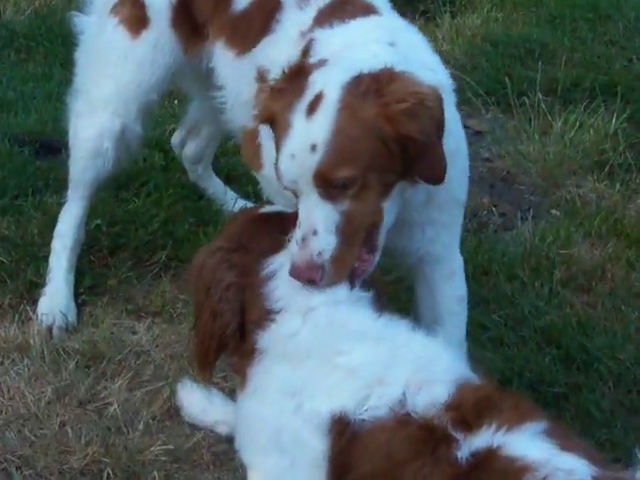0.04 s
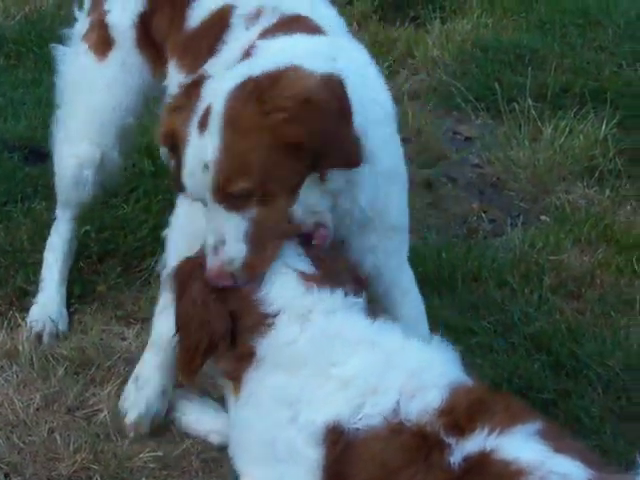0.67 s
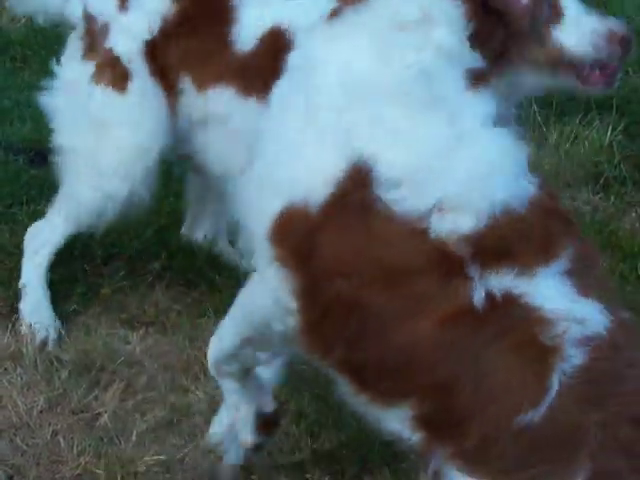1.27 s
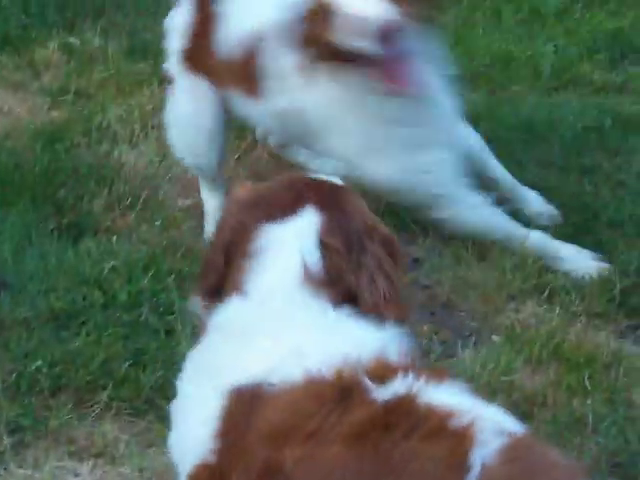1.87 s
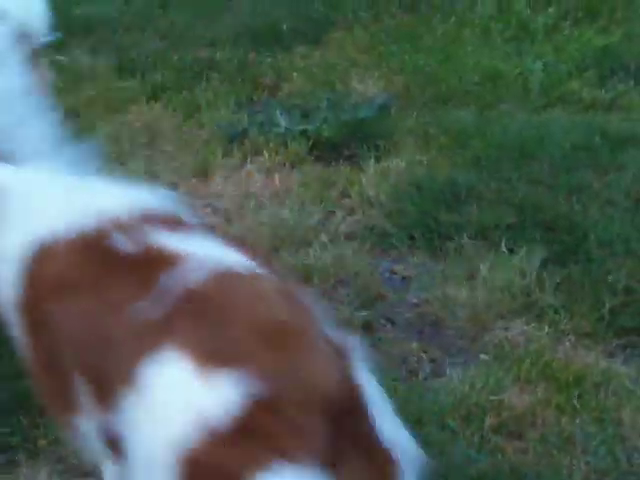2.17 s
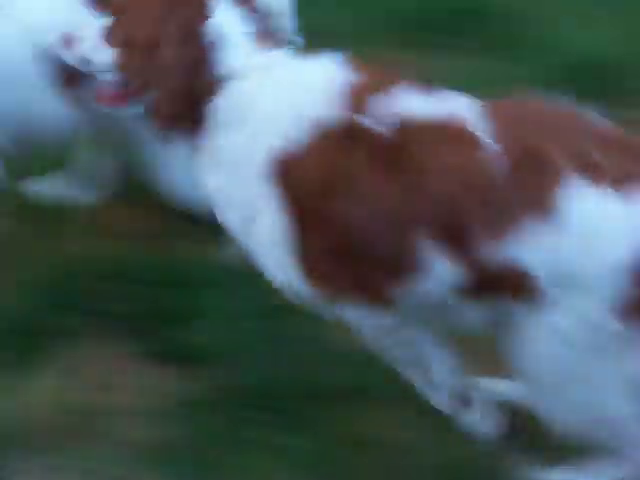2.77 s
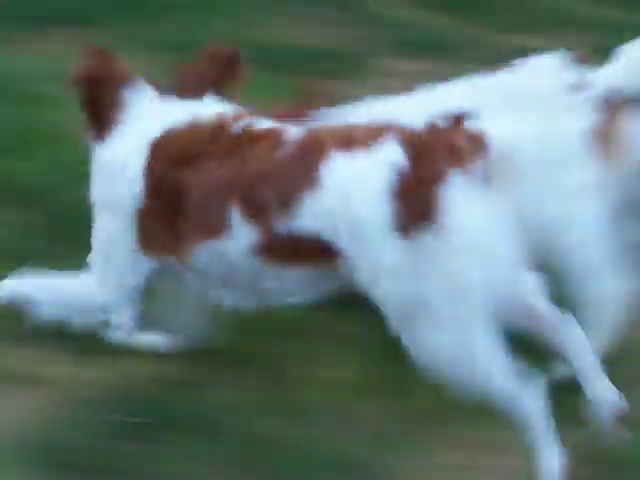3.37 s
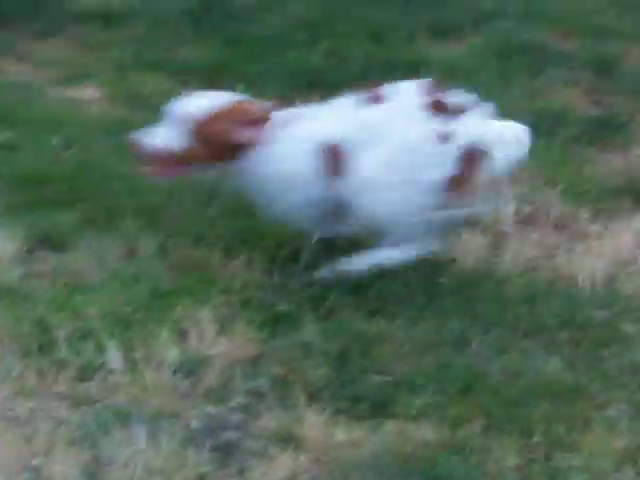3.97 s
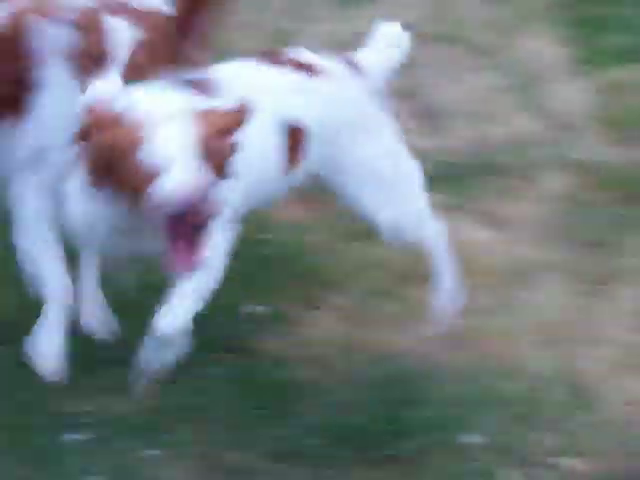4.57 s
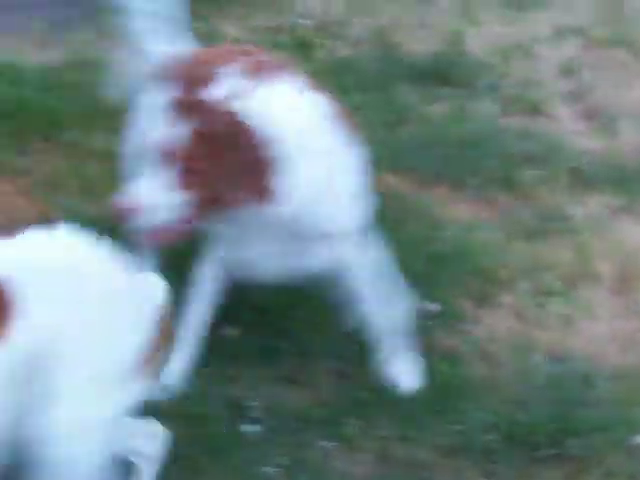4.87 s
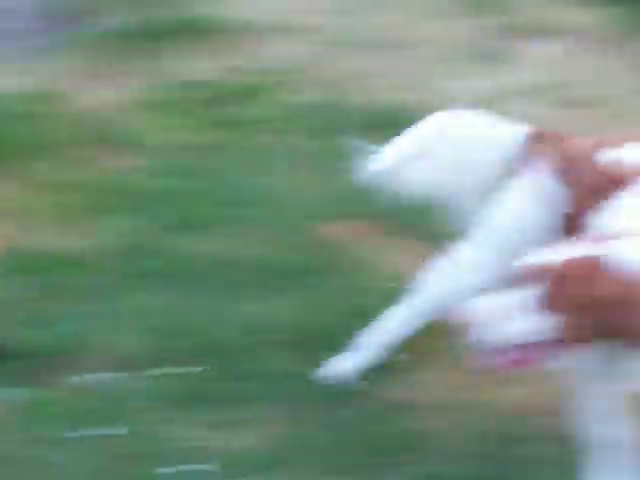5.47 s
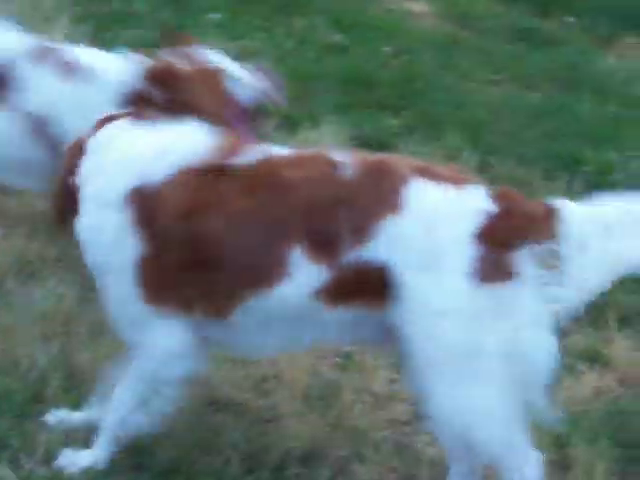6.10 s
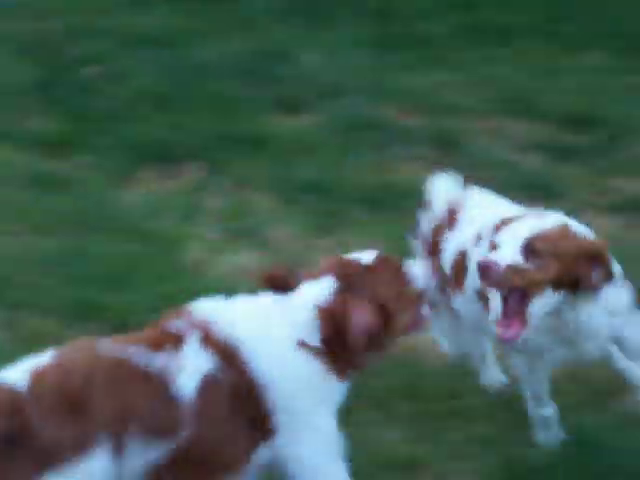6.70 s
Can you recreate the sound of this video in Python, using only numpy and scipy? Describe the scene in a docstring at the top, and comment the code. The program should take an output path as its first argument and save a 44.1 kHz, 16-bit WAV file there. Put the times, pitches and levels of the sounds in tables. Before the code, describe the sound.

Two dogs play-fight close by on a lawn, over soft, low outdoor air. From about 0.5 seconds come faint breathy huffs, and paws begin a light grass rustle that continues throughout. A brief growl and snarl sound at 1.2 seconds, with a small huff at 1.7. A loud, rough growl with a hissing rasp runs from 2.2 to 2.8 seconds, and a somewhat softer one from 3.2 to 3.7, with a jaw snap in it. Around 4.3 to 4.8 seconds a short growl mixes with several quick snaps and paw knocks, followed by another growl until 5.3. At about 5.85 seconds one dog gives a loud, hoarse bark. From 6.1 it slides into a yowl that rises to a peak near 6.35 and sinks back into a growl by 6.6. A quick snarl and a knock finish it. The yard adds a faint echo.

```python
"""Two dogs play-fighting on a lawn

Slack vocal folds shake chest and throat in bursts of growling; bared teeth add rasp, hiss and whistles.
Then one dog barks, and taut folds slide into a yowl that arches and sinks back to a growl.
Paws rustle in the grass, jaws snap, and the yard returns a faint echo over soft outdoor air."""
import sys
import numpy as np
from scipy import signal
from scipy.io import wavfile
from scipy.ndimage import uniform_filter1d

SR = 44100
rng = np.random.default_rng(int(sys.argv[2]) if len(sys.argv) > 2 else 0)


def transcribe(signal):
    """Save signal, clipped to [-1, 1], as a 16-bit WAV file at the path in sys.argv[1]."""
    frames = np.atleast_2d(signal).T
    limited = np.clip(frames, -1, 1)
    pcm = np.round(limited * 32767).astype(np.int16)
    wavfile.write(sys.argv[1], SR, pcm)


N = 297234
T = np.arange(N) / SR


def amp(db):
    """Decibels to gain."""
    return 10 ** (np.asarray(db) / 20)


def unit(x):
    """Scales to rms 1."""
    return x / np.sqrt(np.mean(x ** 2) + 1e-20)


def steady(x, size=1000):
    """Rides the gain to a running rms of 1, keeping the single pulses."""
    power = uniform_filter1d(uniform_filter1d(x ** 2, size), size)
    return x / np.sqrt(abs(power) + 1e-20)


def curve(t, points):
    """Automation: straight lines through (time, value) points."""
    return np.interp(t, *np.transpose(points))


def eq_db(points, hz):
    """An EQ curve's gain in dB at the given frequencies."""
    f, db = np.transpose(points)
    return np.interp(np.log(hz + 1), np.log(f), db)


def add(mix, start, sound):
    """Mixes a sound in at a time in seconds."""
    part = mix[max(round(start * SR), 0):][:len(sound)]
    part += sound[:len(part)]


def drift(t, hz):
    """Random wander of about unit size at the given rate."""
    knots = rng.standard_normal(8192)
    return np.interp((t - t[0]) * hz, np.arange(len(knots)), knots)


def colour(x, points, notches=(), size=4096):
    """Minimum-phase EQ with optional notches."""
    hz = abs(np.fft.fftfreq(size, 1 / SR))
    notch_db = sum(db / (1 + (2 * (hz - f) / width) ** 2) for f, width, db in notches)
    log_gain = np.log(amp(eq_db(points, hz) + notch_db))
    taps = np.fft.ifft(np.exp(np.conj(signal.hilbert(log_gain)))).real
    return signal.oaconvolve(x, taps)[:len(x)]


def resonate(x, hz, width_hz):
    """A sweepable resonance of gain 1."""
    turn = np.exp(2j * np.pi * np.cumsum(hz * np.ones(len(x))) / SR)
    pole = np.exp(-np.pi * width_hz / SR)
    return 2 * (turn * signal.lfilter([1 - pole], [1, -pole], x / turn)).real


def swell(start, length, attack_s, release_s, sag_db_per_s=0):
    """Scene-long gain envelope; attack and release are the times to move 20 dB."""
    outside = np.maximum(start - T, 0) / attack_s + np.maximum(T - start - length, 0) / release_s
    return amp(-20 * np.minimum(outside, 10) - sag_db_per_s * np.clip(T - start, 0, length))


def level(gains):
    """Joint level in dB of overlapping envelopes."""
    return 10 * np.log10(sum(g ** 2 for g in gains))


def blend(efforts):
    """Joint level in dB of (gain, setting) pairs, and their setting, led by the strongest."""
    gains = [g for g, _ in efforts]
    setting = sum(g ** 2 * value for g, value in efforts) / sum(g ** 2 for g in gains)
    return level(gains), setting


# Tone of the outdoor bed: f/Hz, gain/dB
AIR_EQ = [(25, -46.5), (50, -4.5), (115, -1), (250, -7), (500, -13), (1200, -24.5), (3000, -31),
          (7500, -36.5)]


def outdoor_air():
    """A low, soft bed of steady noise."""
    return amp(-51) * unit(colour(rng.standard_normal(N), AIR_EQ))


# Fader ride of the scuffle: t/s, level/dB
SCUFFLE_RIDE = [(0, -83), (0.5, -76), (0.8, -61), (1.1, -61.5), (2.05, -57.5), (3.9, -54), (4.68, -57.5),
                (5.42, -55), (6.74, -56)]
# Tone of the rustle: f/Hz, gain/dB
GRASS_EQ = [(200, -35), (600, 3), (1200, 6), (4000, -1.5), (6900, 4), (8000, -6.5)]


def grass(cracks_per_s=1200):
    """Blades and dry stalks crackle under the paws, in clumps."""
    strength = amp(4.1 * np.minimum(rng.exponential(1, N), 5))
    cracks = strength * rng.standard_normal(N) * (rng.random(N) < cracks_per_s / SR)
    rustle = unit(colour(unit(cracks) + rng.standard_normal(N), GRASS_EQ))
    clumps_db = 2.5 * drift(T, 35)
    return rustle * amp(curve(T, SCUFFLE_RIDE) + clumps_db)


def folds(t, hz, jitter, shimmer_db, puff_cycles):
    """Uneven slaps of the vocal folds, and the puff of air that follows each."""
    turns = np.cumsum(hz * np.exp(jitter * drift(t, 150))) / SR
    cycle = turns.astype(int)
    force = amp(shimmer_db * np.clip(rng.standard_normal(2048), -2, 1))[cycle]
    slaps = -force * np.diff(cycle, prepend=0)
    airflow = .35 + np.exp(-(turns % 1) / puff_cycles)
    breath = force * airflow * rng.standard_normal(N)[:len(t)]
    return unit(slaps), unit(breath)


def cavities(t, x, modes, stretch, direct):
    """Formants, tuned by the factor stretch, wander as the lips and tongue move."""
    ringing = 0
    for hz, width_hz, db in modes:
        wander = 1 + .05 * drift(t, 18)
        ringing = ringing + amp(db) * resonate(x, hz * stretch * wander, width_hz)
    return ringing + direct * x


# Low growls: t/s, length/s, chest/dB, throat/dB, rasp/dB, half-closed mouth/Hz, ring/0-1, fold rate/Hz
GROWL_CUES = [(1.194, 0.13, -41, -46.5, -51.5, 700, 0.19, 165.3),
              (2.205, 0.58, -30.5, -31, -36.5, 864, 0.92, 118),
              (3.175, 0.485, -34.5, -34.5, -40.5, 1035, 0.09, 134),
              (4.378, 0.11, -37, -39, -44.5, 663, 1.0, 164.9),
              (4.799, 0.48, -37.5, -38, -44.5, 805, 1, 104),
              (5.783, 0.06, -39, -37.5, -50, 797, 0.5, 122.1),
              (5.958, 0.084, -41, -39, -55, 785, 0.5, 149.9), (6.587, 0.068, -42, -31.5, -44, 905, 1, 115)]
# Hard pushes of air within a growl: t/s, length/s, throat/dB, mouth/Hz
PUSH_CUES = [(1.26, 0.036, -39.5, 740), (2.254, 0.034, -21, 898), (2.293, 0.042, -15, 846),
             (2.405, 0.078, -21, 742), (2.583, 0.011, -28, 810), (3.219, 0.059, -31.5, 1180),
             (4.822, 0.05, -31, 828), (4.909, 0.02, -34, 1150), (5.087, 0.047, -29.5, 650),
             (5.163, 0.02, -34, 691.7)]
# Airy snarls and huffs through bared teeth: t/s, length/s, rasp/dB, hiss/dB, throat/dB, mouth/Hz
SNARL_CUES = [(0.54, 0.22, -50, -62, -50.5, 1220), (1.154, 0.035, -51, -63, -52.5, 900),
              (0.753, 0.015, -47, -52.5, -49, 1360), (1.248, 0.064, -40.5, -48, -48.5, 1380),
              (1.358, 0.019, -48, -60, -49, 1480), (1.651, 0.037, -45, -58, -47.5, 1260),
              (1.716, 0.027, -51.5, -61, -51.5, 1300), (2.162, 0.044, -45, -49, -56, 900),
              (2.236, 0.094, -27, -32, -32.5, 920), (2.389, 0.054, -42, -36, -40, 750),
              (2.677, 0.079, -45.5, -48, -34.5, 1030), (2.775, 0.011, -31.5, -41, -34, 1190),
              (3.159, 0.1, -38.5, -52.5, -55, 1000), (3.682, 0.056, -40.5, -58, -50.5, 1540),
              (4.348, 0.14, -45, -47.5, -51, 700), (4.787, 0.079, -44, -53, -44, 1500),
              (5.249, 0.069, -41, -54.5, -46, 1400), (6.65, 0.0086, -33, -47.5, -41, 1290)]


def growl_effort(open_hz=1296):
    """Growls, pushes and snarls together ride the levels of the voice and shape the mouth."""
    chest, throat, covered_rasp, bared_rasp, hiss = [], [], [], [], []
    for start, length, chest_db, throat_db, rasp_db, shut_hz, ring, fold_hz in GROWL_CUES:
        # a growl sags as the air runs out, and the mouth opens late
        chest_effort = swell(start, length, attack_s=.041, release_s=.027, sag_db_per_s=11.5)
        effort = swell(start, length, attack_s=.041, release_s=.027, sag_db_per_s=16)
        opening = np.clip((T - start) / length, 0, 1) ** 4
        chest.append((amp(chest_db) * chest_effort, np.array([[ring], [fold_hz]])))
        throat.append((amp(throat_db) * effort, shut_hz + (open_hz - shut_hz) * opening))
        covered_rasp.append(amp(rasp_db) * effort)
    for start, length, throat_db, mouth_hz in PUSH_CUES:
        effort = amp(throat_db) * swell(start, length, attack_s=.031, release_s=.038)
        throat.append((effort, mouth_hz))
        covered_rasp.append(amp(-12) * effort)
    for start, length, rasp_db, hiss_db, throat_db, mouth_hz in SNARL_CUES:
        effort = swell(start, length, attack_s=.029, release_s=.058)
        throat.append((amp(throat_db) * effort, mouth_hz))
        bared_rasp.append(amp(rasp_db) * effort)
        hiss.append(amp(hiss_db) * effort)
    covered_db = level(covered_rasp)
    rasp = [(amp(covered_db), 0), (amp(level(bared_rasp)), 1)]
    hiss.append(amp(covered_db - 11.5))  # some hiss escapes while the lips cover the teeth
    return blend(chest), blend(throat), blend(rasp), level(hiss)


# Tone of the chest rumble, throat body, rasp and hiss at the teeth: f/Hz, gain/dB
CHEST_EQ = [(40, -59.5), (78, -8), (120, 0), (175, -3.5), (245, -1.5), (310, -10.5), (480, -31),
            (1500, -72)]
THROAT_EQ = [(250, -39), (390, -9.5), (580, -3), (800, -3.5), (1150, 0), (1450, -6.5), (2000, -24),
             (3500, -43.5)]
RASP_EQ = [(700, -32.5), (1250, -3), (1550, -3), (2900, -3.5), (3500, -14.5), (4200, -28), (6000, -57.5)]
TEETH_EQ = [(2500, -14.5), (3700, 0.5), (6700, 3.5), (7400, -9), (9000, -12.5)]
# Formants of the muzzle and the tooth gaps, before the mouth retunes them: f/Hz, width/Hz, gain/dB
MUZZLE_MODES = [(1532, 130, 8.5), (1940, 480, 2), (2630, 42, 7.5), (3433, 280, 7)]
TOOTH_GAP_MODES = [(3440, 110, -14), (5650, 660, -21), (7070, 550, -12.5)]


def growling():
    """Slack folds shake the chest and ring the mouth; bared teeth add rasp and hiss."""
    (chest_db, (depth, fold_hz)), (throat_db, mouth_hz), (rasp_db, bared), hiss_db = growl_effort()
    flutter_hz = fold_hz * (1 + .09 * drift(T, 14))
    slaps, breath = folds(T, flutter_hz, jitter=.15, shimmer_db=3, puff_cycles=.51)
    # as the mouth opens wide the growl turns into an airy snarl
    rough = np.interp(mouth_hz, [800, 1400], [.42, .7])
    drive = (1 - rough) * slaps + rough * breath
    chest = colour(slaps + .72 * breath, CHEST_EQ)
    throat = colour(drive, THROAT_EQ)
    # the mouth rings most when pushed hard and half closed
    ring = 5.4 * depth * amp(.18 * (throat_db + 35.5)) * (850 / mouth_hz) ** 1.3
    mouth = ring * resonate(throat, mouth_hz, width_hz=65)
    pharynx = .26 * resonate(throat, mouth_hz / 2, width_hz=110)
    body = throat + mouth + pharynx
    rasp = cavities(T, colour(drive, RASP_EQ), MUZZLE_MODES, (mouth_hz / 1000) ** .24, direct=.27)
    muffled = colour(rasp, [(2100, -2), (3000, -16.5)])  # behind nearly closed lips
    rasp = bared * rasp + (1 - bared) * muffled
    hiss = colour(breath + .096 * slaps, TEETH_EQ)
    hiss = cavities(T, hiss, TOOTH_GAP_MODES, (mouth_hz / 900) ** -.08, direct=.12)
    gargle_db = 1.96 * drift(T, hz=44.87)  # the throat catches unevenly
    layers = [(body, throat_db + gargle_db), (chest, chest_db),
              (rasp, rasp_db + gargle_db), (hiss, hiss_db)]
    return sum(steady(x) * amp(db) for x, db in layers)


# Short clicks and knocks (jaw snaps, paw hits and the sharp starts of snarls), before the trim:
# t/s, thump/dB, knock/dB, crackle/dB, length/s
CLICK_CUES = [(1.148, -65, -66, -59, 0.0072), (1.558, -69, -59, -53, 0.023), (3.17, -55, -58, -43.5, 0.006),
              (3.354, -48, -32, -68, 0.01), (3.622, -60, -63, -49, 0.008), (3.939, -59, -53.5, -48, 0.0029),
              (4.114, -64, -72, -67, 0.0036), (4.308, -52, -68, -57, 0.016), (4.487, -58, -50, -31, 0.024),
              (4.526, -58, -39, -39.5, 0.014), (4.54, -37.5, -48, -45, 0.0093),
              (4.589, -61, -68, -50.5, 0.0083), (4.62, -68, -42.5, -52, 0.0055),
              (4.692, -50, -47, -67, 0.018), (4.782, -52, -40, -54, 0.008),
              (6.733, -38, -42.5, -49, 0.0044)]
# Bands of the thump, knock and crackle: low/Hz, high/Hz
CLICK_BANDS = [(80, 190), (550, 1330), (2300, 5400)]


def click(cue, trim_db=-8.5):
    """A short burst of noise: a dull thump with a knock and a crackle on top."""
    start, *band_db, length = cue
    t = T[:4096]
    attack = np.minimum(t / (.52 * length), 1)
    decay = np.exp(-t / max(length / 2, .001))
    burst = rng.standard_normal(len(t)) * attack * decay
    filters = [signal.butter(2, band, "band", fs=SR, output="sos") for band in CLICK_BANDS]
    transient = sum(amp(db) * unit(signal.sosfilt(sos, burst)) for sos, db in zip(filters, band_db))
    return start, amp(trim_db) * transient


# Whistles on the sharper snarls: t/s, length/s, level/dB, first f/Hz, last f/Hz
WHISTLE_CUES = [(1.155, 0.035, -52, 2010, 1900), (1.227, 0.09, -53, 5200, 4870),
                (1.237, 0.033, -49, 4570, 3900), (1.241, 0.08, -42.5, 2780, 2470),
                (1.237, 0.12, -42, 1970, 1490), (1.651, 0.025, -42.5, 1250, 1190),
                (2.185, 0.049, -41.5, 3010, 2840), (2.405, 0.013, -38.5, 3120, 3300),
                (2.775, 0.013, -44.5, 3770, 3820), (3.678, 0.08, -47.5, 2690, 2730)]


def whistle(cue, width_hz=240, fade_s=.02):
    """Rushing air rings a narrow gap between teeth and lips; the pitch slides as the lips move."""
    start, length, db, first_hz, last_hz = cue
    t = np.arange(-fade_s, length + fade_s, 1 / SR)
    hz = np.interp(t, [0, length], [first_hz, last_hz])
    breath = rng.standard_normal(N)[:len(t)]
    tone = resonate(resonate(breath, hz, width_hz), hz, width_hz)
    fade = np.interp(t, [t[0], 0, length, t[-1]], [0, 1, 1, 0])
    return start + t[0], amp(db) * fade ** 2 * unit(tone)


# The bark and the hoarse breaks after it: t/s, length/s, level/dB, roughness/0-1, attack/s
BARK_CUES = [(5.854, 0.023, -11.5, 0.31, 0.06), (5.91, 0.055, -33, 0.7, 0.041),
             (6.041, 0.024, -23, 0.58, 0.087), (6.205, 0.013, -23.5, 0.48, 0.023),
             (6.435, 0.087, -32.5, 0.7, 0.054)]
# Tone of the wide open throat, and of the air rushing past the teeth: f/Hz, gain/dB
BARK_EQ = [(60, -32), (150, -18), (230, -10.5), (320, -21.5), (500, -8), (800, -4), (1200, -1.5),
           (1900, -10), (2600, -11), (3200, -22.5), (3900, -59.5)]
BARK_HISS_EQ = [(3000, -21), (4400, -19), (5400, -14.5), (6700, -7.5), (7600, -25)]


def bark(fold_hz=166, edge_roughness=.87, onset_db=-35.5):
    """Hard, nearly regular slaps of the folds through a wide open throat, hoarse at both ends."""
    efforts = []
    for start, length, db, rough, attack_s in BARK_CUES:
        effort = swell(start, length, attack_s, release_s=.04)
        efforts.append((amp(db) * effort, edge_roughness + (rough - edge_roughness) * effort))
    db, rough = blend(efforts)
    voiced = np.flatnonzero(db > onset_db)
    span = slice(voiced[0], voiced[-1])
    t, db, rough = T[span], db[span], rough[span]
    slaps, breath = folds(t, fold_hz, jitter=.0506, shimmer_db=2.5, puff_cycles=1)
    voice = colour((1 - rough) * slaps + rough * breath, BARK_EQ)
    voice = cavities(t, voice, [(860, 130, .0033), (1180, 75, .0073)], stretch=.97, direct=1.6)
    hiss = amp(-20) * unit(colour(breath, BARK_HISS_EQ))
    # the chest rumbles on and grows only a little with the effort
    chest = amp(.32 * db - 47) * unit(colour(breath, CHEST_EQ))
    return t[0], amp(db) * (steady(voice, size=700) + hiss) + chest


# Arch of the clear yowl: t/s, f/Hz, level/dB
YOWL_ARCH = [(6.07, 441, -18), (6.084, 451.9, -28.5), (6.12, 437.4, -22.5), (6.204, 446.3, -26.5),
             (6.234, 503.5, -24.5), (6.264, 525.2, -28), (6.298, 624.5, -21.5), (6.344, 680, -16.5),
             (6.368, 636, -16), (6.382, 583.5, -23.5), (6.404, 481, -26.5), (6.458, 412, -18.5),
             (6.482, 398, -20.5), (6.526, 413.8, -17.5), (6.55, 397.8, -19), (6.59, 344, -32)]
# Formant sweep as the mouth gapes at the top of the yowl, then closes: t/s, f/Hz
MOUTH_SWEEP = [(6.06, 950), (6.12, 1300), (6.26, 1235), (6.345, 1800), (6.38, 1440), (6.43, 900),
               (6.48, 840), (6.53, 1046), (6.58, 930)]
# Tone of the yowling throat: f/Hz, gain/dB
YOWL_EQ = [(330, 0), (650, 3), (1000, 4), (1350, -0.5), (2000, -8.5), (2600, -8), (3900, -55.5),
           (4800, -33), (6500, -25.5), (7600, -36)]


def yowl(harmonics=19):
    """Taut folds sing a stack of harmonics; the mouth lifts whichever lies at its resonance."""
    times, pitches, levels = np.transpose(YOWL_ARCH)
    t = np.arange(times[0], times[-1], 1 / SR)
    hz = np.interp(t, times, pitches) * (1 + .013 * drift(t, 160))
    db = np.interp(t, times, levels)
    mouth_hz = curve(t, MOUTH_SWEEP)
    phase = 2 * np.pi * np.cumsum(hz) / SR
    shelf_db = .5 * (db + 31) + 6 * np.log2(hz / 520)  # louder and higher notes are brighter
    voice, power = 0, 0
    for k in range(1, harmonics + 1):
        lift_db = 10 / (1 + ((k * hz - mouth_hz) / 170) ** 2)
        bright_db = shelf_db * np.clip(np.log2(k * hz / 1100), 0, 1)
        waver_db = 3.5 * drift(t, 30)
        gain = amp(eq_db(YOWL_EQ, k * hz) + lift_db + bright_db + waver_db)
        blur = .013 * k ** 2 * drift(t, 900)  # unsteady folds smear the upper harmonics
        shimmer = 1 + .24 * drift(t, 220)
        voice = voice + gain * shimmer * np.cos(k * phase + blur + 2 * np.pi * rng.random())
        power = power + gain ** 2 / 2
    # air leaks between the teeth in step with the folds
    breath = rng.standard_normal(N)[:len(t)] * (1 + np.cos(phase))
    leak = amp(-42) * unit(colour(breath, TEETH_EQ))
    envelope = amp(db) * signal.windows.tukey(len(t), .07)
    return t[0], envelope * (voice / np.sqrt(power) + leak)


# Early reflections off the ground and nearby surfaces: delay/s, gain/ratio
REFLECTIONS = [(.0029, 0.028), (.0052, 0.06), (0.018, .12)]


def yard(x, tail_db=-17, t60_s=.32, echoes_per_s=2000):
    """The yard adds a few close reflections and a thin, dull tail."""
    t = T[:SR // 2]
    taps = rng.standard_normal(len(t)) * (rng.random(len(t)) < echoes_per_s / SR) * (t > .015)
    tail = colour(taps * amp(-60 * t / t60_s), [(150, 9.5), (600, 2), (2500, 2.5), (7000, -8)])
    response = amp(tail_db) * tail / np.linalg.norm(tail)
    for delay, gain in REFLECTIONS:
        add(response, delay, np.array([gain]))
    return x + signal.oaconvolve(x, response)[:N]


def scene():
    """The dogs and their echo over dry grass rustle and outdoor air, in mono."""
    dogs = growling()
    for start, sound in [bark(), yowl(), *map(click, CLICK_CUES), *map(whistle, WHISTLE_CUES)]:
        add(dogs, start, sound)
    return (yard(dogs) + grass() + outdoor_air())[None]


# Notches that colour the microphone: f/Hz, width/Hz, gain/dB
MIC_NOTCHES = [(300.6, 34, -12.5), (969, 17.6, -33)]
# The recorder's treble roll-off: f/Hz, gain/dB
TREBLE_ROLLOFF = [(7000, -0.5), (7400, -2.5), (7900, -18), (8900, -18)]


def record(dry, cutoff_hz=8900):
    """Microphone colour, soft overload on the loudest peaks, then a steep low-pass."""
    coloured = colour(dry[0], TREBLE_ROLLOFF, MIC_NOTCHES)
    limited = coloured / (1 + coloured ** 6) ** (1 / 6)
    lowpass = signal.firwin(511, cutoff_hz, window=("kaiser", 9), fs=SR)
    return signal.oaconvolve(limited, lowpass, "same")[None]


dry = scene()
out = record(dry)
transcribe(out)
```